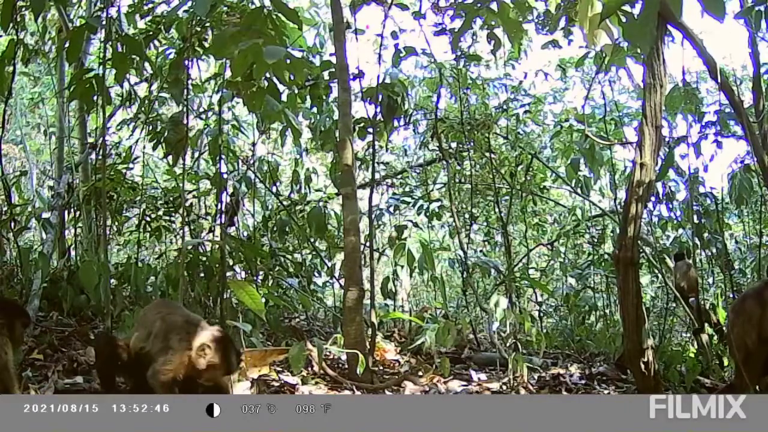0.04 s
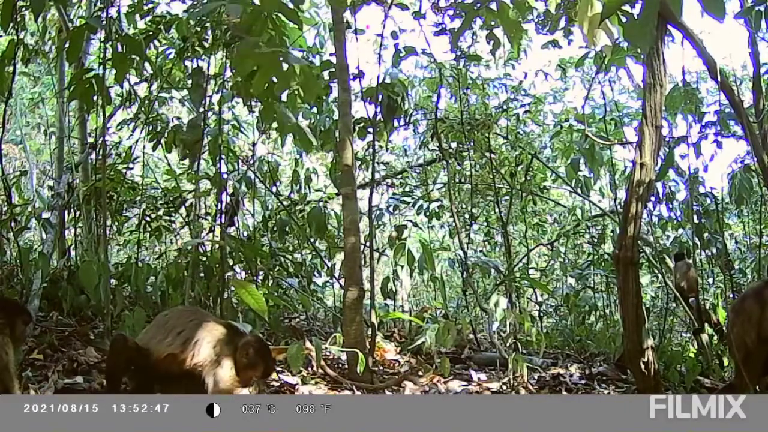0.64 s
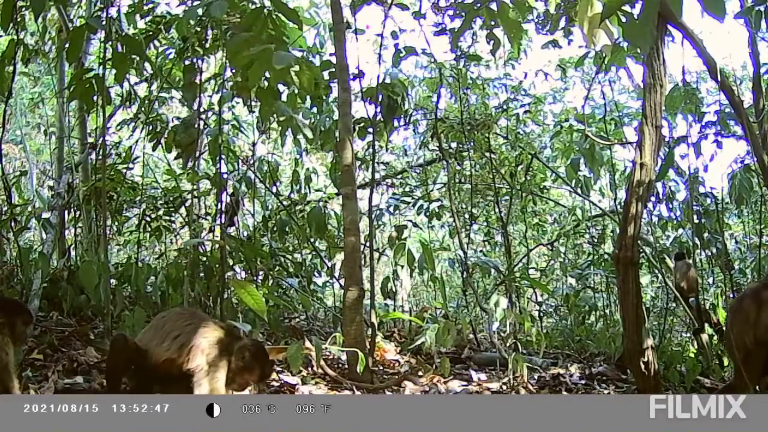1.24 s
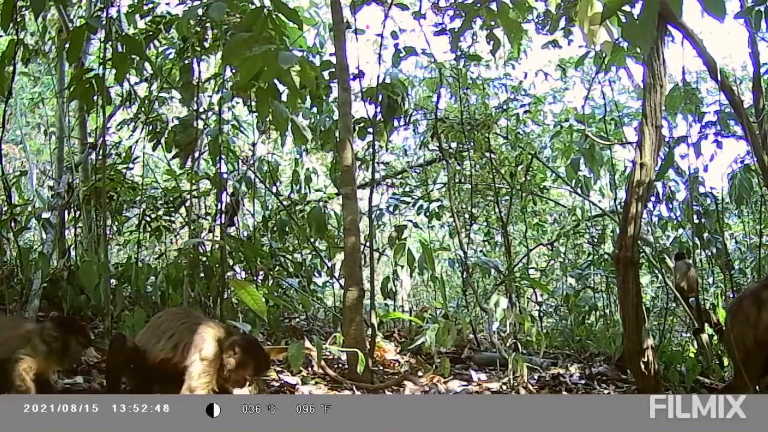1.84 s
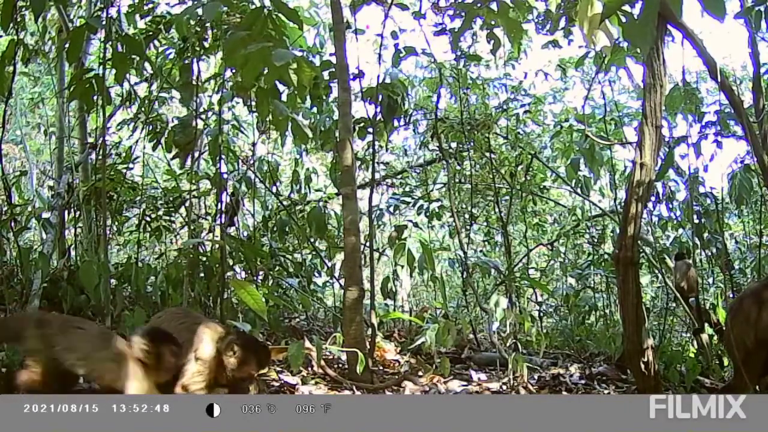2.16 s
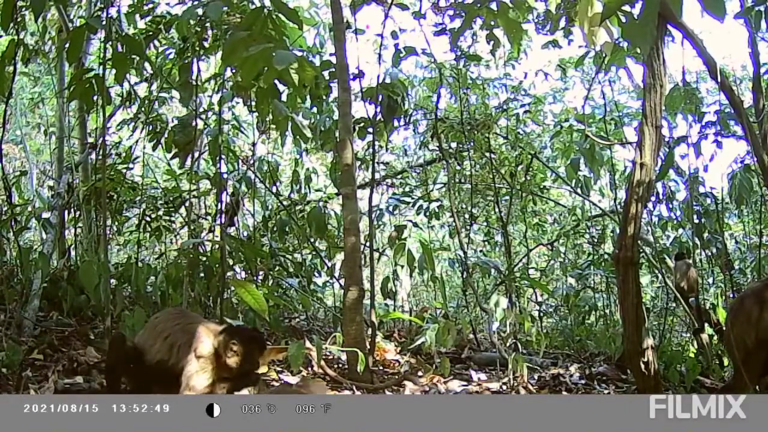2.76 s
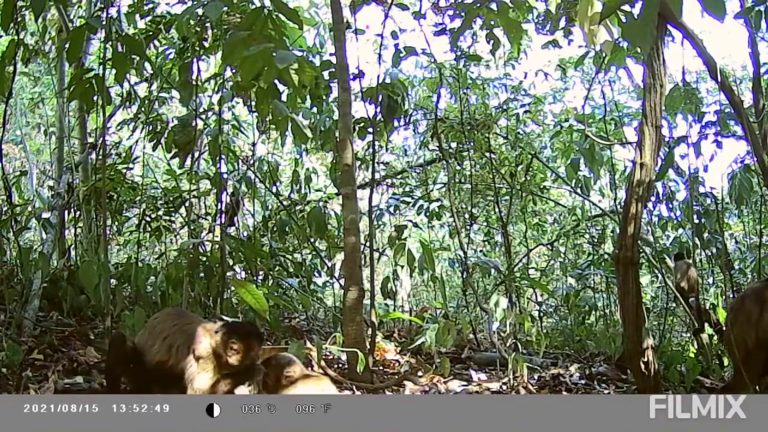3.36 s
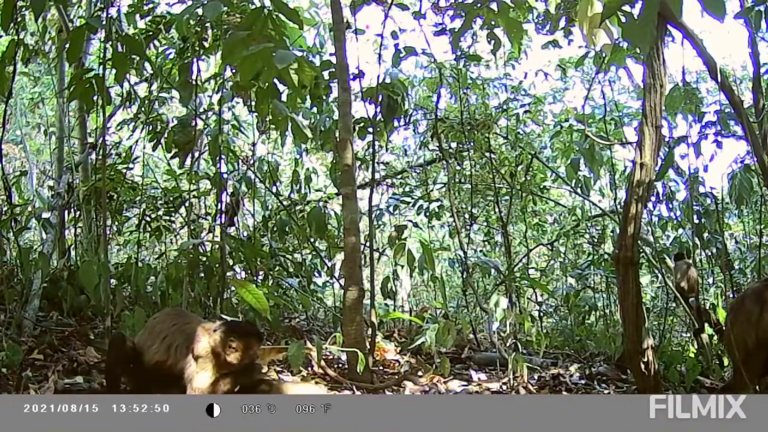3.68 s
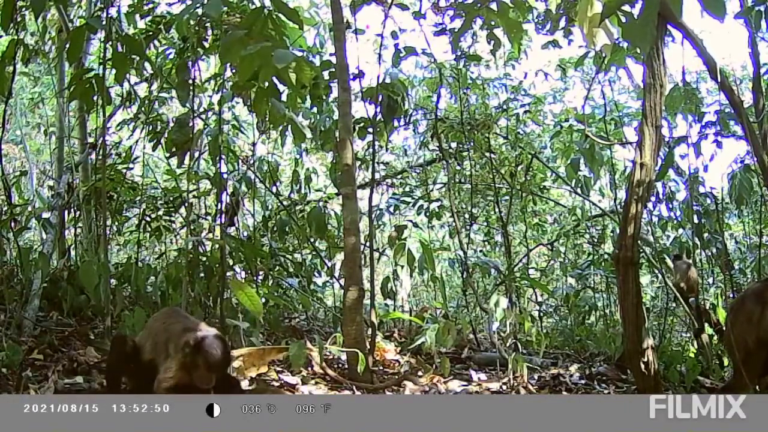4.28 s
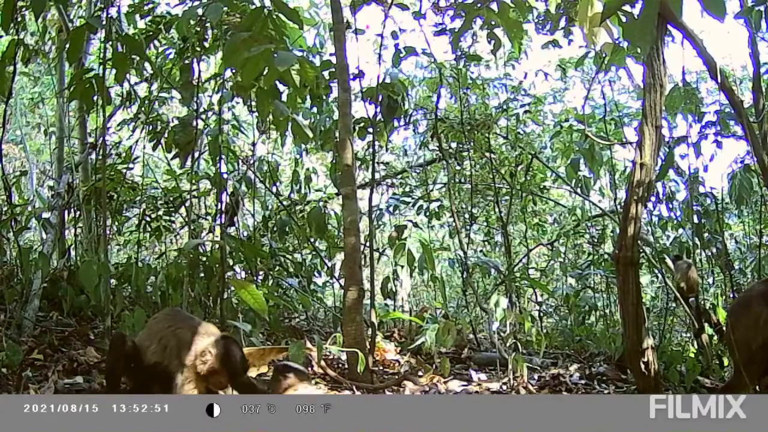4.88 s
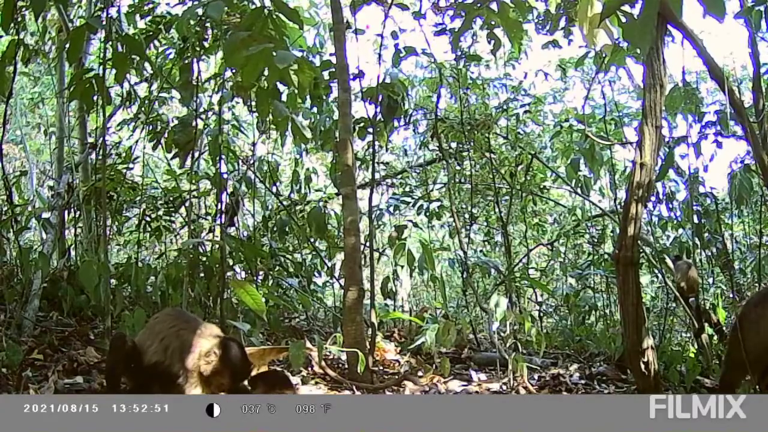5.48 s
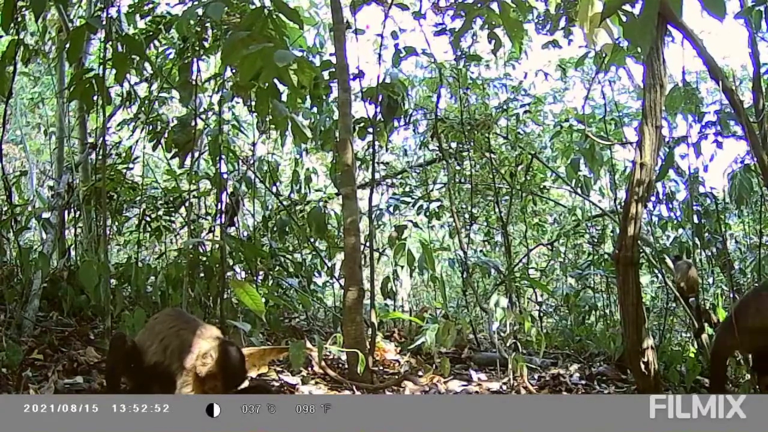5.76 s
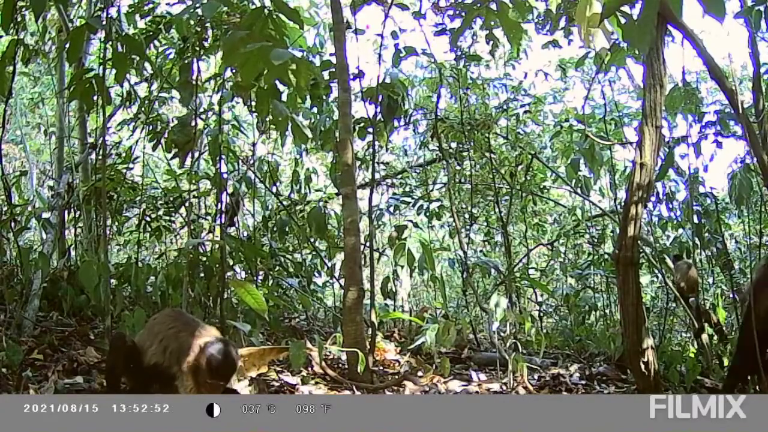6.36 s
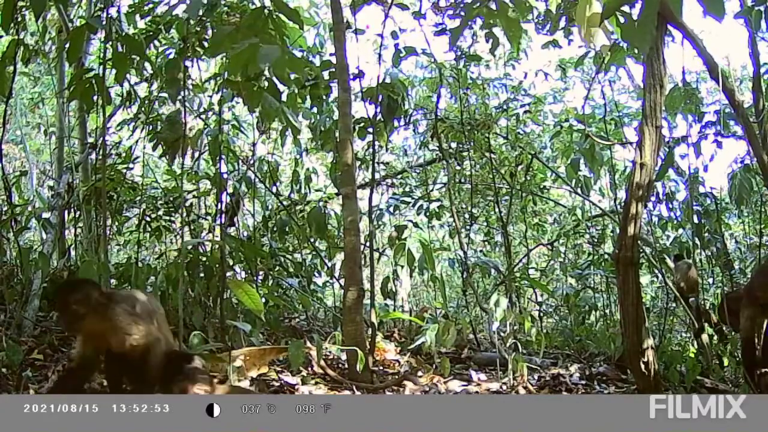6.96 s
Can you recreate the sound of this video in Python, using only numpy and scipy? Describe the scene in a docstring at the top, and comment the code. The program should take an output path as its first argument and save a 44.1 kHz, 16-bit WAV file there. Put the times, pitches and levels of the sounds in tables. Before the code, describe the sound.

Monkeys rummage in dry leaves close to the microphone, under a constant high cicada chorus and a faint low forest murmur. Short, pure chirps open, and a nearby cicada starts buzzing. One falling, raspy squeak leads into crackling leaves and small twig snaps. Distant mews and soft whistles come and go. The near cicada pauses during the loudest burst of chirps, then resumes among the final calls.

```python
"""Capuchin monkeys forage on a forest floor, heard by a faintly humming trail camera under steady cicadas.
First come steps in dry leaves, a few close, pure chirps and a far mew; the nearest cicada starts to buzz.
At 2 s a close squeak plunges and breaks into a rasp, then leaves crunch and twigs tick under their hands.
From 4.5 s soft whistles come from deeper in the trees, and at 5 s the loudest chirps, near the microphone.
The nearest cicada rests through these and resumes at 6.3 s, among the last calls and rustles."""
import sys
import numpy as np
from scipy import signal
from scipy.fft import rfft, irfft
from scipy.io import wavfile
from scipy.ndimage import uniform_filter1d, map_coordinates

SR = 44100
rng = np.random.default_rng(int(sys.argv[2]) if len(sys.argv) > 2 else 0)


def log_audio(samples):
    """Write samples as a 16-bit WAV file to the path given in sys.argv[1]."""
    # one column per channel
    frames = np.atleast_2d(samples).T
    # limit to full scale, then quantise
    limited = np.clip(frames, -1, 1)
    pcm = np.round(limited * 32767).astype(np.int16)
    wavfile.write(sys.argv[1], SR, pcm)


N = 314433
T = np.arange(N) / SR


def from_db(db):
    """Decibels to gain."""
    return 10 ** (np.asarray(db) / 20)


def rms_one(x):
    """Scale to rms 1."""
    return x / np.sqrt(np.mean(x ** 2) + 1e-20)


def in_time(rows, t=T):
    """Each column of a timed table, joined by straight lines."""
    times, *columns = np.transpose(sorted(map(tuple, rows)))
    return [np.interp(t, times, column) for column in columns]


def span(length):
    """Progress from 0 to 1 through a sound of this length in seconds."""
    return np.linspace(0, 1, max(int(length * SR), 2))


def drift(per_s, size=N):
    """A smooth random wander with a spread of about 1."""
    knots = rng.standard_normal(int(size / SR * per_s) + 4)
    return map_coordinates(knots, [np.arange(size) * per_s / SR], order=2, mode="nearest")


def colour(x, spectrum):
    """Filter by a spectrum that falls 20 dB an octave past its ends."""
    hz, db = np.transpose(sorted(map(tuple, spectrum)))
    octave = np.log2(np.maximum(np.arange(N // 2 + 1) * SR / N, 1))
    outside = np.abs(octave - np.clip(octave, np.log2(hz[0]), np.log2(hz[-1])))
    return irfft(rfft(x) * from_db(np.interp(octave, np.log2(hz), db) - 20 * outside), N)


def band(x, low_hz, high_hz):
    """Causal band-pass."""
    return signal.sosfilt(signal.butter(2, [low_hz, high_hz], "band", fs=SR, output="sos"), x + 1e-18)


def resonate(x, modes):
    """Parallel resonances with alternating signs."""
    out = 0
    for k, (hz, width, db) in enumerate(modes):
        r = np.exp(-np.pi * width / SR)
        ring = signal.lfilter([1, 0, -1], [1, -2 * r * np.cos(2 * np.pi * hz / SR), r * r], x + 1e-18)
        out = out + (-1) ** k * from_db(db) * (1 - r * r) / 2 * ring
    return out


def pulses(per_s):
    """One click a cycle, shared between its two neighbouring samples."""
    cycles = np.cumsum(per_s) / SR
    fired = np.diff(np.floor(cycles), prepend=0)
    late = fired * (cycles % 1) * SR / per_s
    return fired - late + np.roll(late, -1)


def add(out, start_s, sound):
    """Mix a sound in at a time."""
    at = max(int(start_s * SR), 0)
    out[at:at + len(sound)] += sound[:max(N - at, 0)]


def trees(x, t60, wet_db):
    """On the way to the microphone a few trunks answer distinctly and foliage scatters a tail."""
    # echoes off trunks and ground: (delay [s], level [dB])
    echoes = [(.013, -27), (.024, -30.5), (.037, -39.5), (.061, -37.5)]
    t = T[:SR]
    response = rng.standard_normal(SR) * from_db(-60 * t / t60) * (1 - np.exp(-t / 0.0046))
    response *= from_db(wet_db) / np.sqrt(np.sum(response ** 2))
    for delay, db in echoes:
        response[int(delay * SR)] += from_db(db)
    return x + signal.fftconvolve(x, response)[:N]


def background(murmur_db=-56, throb_hz=24.3, throb_db=-58):
    """Far forest murmur and a low throb, with the hum of the camera's own electronics."""
    # the distant forest: (frequency [Hz], relative level [dB])
    murmur_spectrum = [(18, -29.5), (30, -4.5), (76, -23), (343, -34.5), (628, -38), (700, -38), (779, -39),
                       (1010, -41), (3380, -40.5), (3930, -42), (5200, -38), (6760, -78), (11400, -120)]
    # camera hum: (frequency [Hz], rms level [dB])
    hum_tones = [(48.5, -75.5), (97, -79.5), (121, -77.5), (145, -78), (681, -80.5), (705, -75), (729, -83)]
    hum = sum(from_db(db) * np.sqrt(2) * np.sin(2 * np.pi * (hz * T + rng.random()))
              for hz, db in hum_tones)
    throb = np.sqrt(2) * from_db(throb_db + 2 * drift(9.4))
    throb *= np.sin(2 * np.pi * throb_hz * T + .3 * drift(8.3))
    murmur = from_db(murmur_db) * rms_one(colour(rng.standard_normal(N), murmur_spectrum))
    return hum * from_db(drift(4.5)) + throb + murmur


def cicada_chorus(level_db, swell_db, whine_db):
    """Many far insects blur into a shrill band with two steady whines in it."""
    # the massed song: (frequency [Hz], relative level [dB])
    song_spectrum = [(4800, -48), (5600, -25), (6000, -16), (6200, -11), (6700, -5), (6800, 1.5), (6920, 0),
                     (7150, 0.5), (7400, -9.5), (7600, -14), (8000, -19.5), (8350, -24), (8650, -37.5),
                     (9000, -20)]
    # its whines: (frequency [Hz], width [Hz], gain [dB])
    whine_modes = [(6900, 11, 2), (7020, 18, -2)]
    low = band(colour(rng.standard_normal(N), song_spectrum), 4500, 7430)
    high = band(colour(rng.standard_normal(N), song_spectrum), 7240, 9450)
    # the insects' pulses come and go on their own in each half of the band
    chorus = rms_one(low * from_db(drift(320)) + high * from_db(1.6 * drift(260)))
    chorus *= from_db(swell_db * drift(11) + 0.49 * drift(40))
    whines = resonate(rng.standard_normal(N), whine_modes)
    whines = resonate(whines, [(hz, 8 * width, 0) for hz, width, _ in whine_modes])  # steeper skirts
    return from_db(level_db) * (chorus + from_db(whine_db) * rms_one(whines))


def nearest_cicada(clicks_per_s, fade_s, whine_db):
    """Tymbal clicks run together into a ringing buzz, smeared by the canopy, beside a thin whine."""
    # bouts of song: (start [s], end [s], buzz level [dB])
    bouts = [(.55, 4.82, -46), (6.33, 7.3, -45.5)]
    # the buzz rings at 6900 and 7400 Hz; 8550 Hz is the camera converter's faint mirror of it:
    # (frequency [Hz], width [Hz], gain [dB])
    buzz_peaks = [(6900, 300, 0), (7400, 250, -3), (8550, 200, -27)]
    # the wandering whine: (time [s], pitch [Hz])
    whine_pitch = [(1.25, 7485), (1.5, 7370), (2.2, 7360), (2.4, 7470), (2.75, 7470), (3.0, 7360),
                   (3.4, 7380), (3.7, 7460), (6.35, 7500), (6.65, 7415)]
    singing = sum(from_db(db) * np.clip(np.minimum(T - start, end - T) / fade_s, 0, 1)
                  for start, end, db in bouts)
    clicks = pulses(clicks_per_s * (1 + .002 * drift(5) + .003 * drift(200)))
    buzz = trees(band(resonate(clicks, buzz_peaks), 6500, 8100), t60=.12, wet_db=3)
    whine_hz, = in_time(whine_pitch)
    whine = from_db(whine_db + 2 * drift(30))
    whine *= np.sin(2 * np.pi * np.cumsum(whine_hz + 10 * drift(150)) / SR)
    return singing * (rms_one(buzz) + whine)


def leaf_litter(stir_db, cracks_per_s, spread_db, friction, settle_s):
    """Dry leaves near the microphone break in tiny cracks of uneven size, over a soft rubbing."""
    # steps and rummaging: (start [s], length [s], level [dB])
    crunches = [(0.267, 0.098, -56), (0.36, 0.071, -53.5), (0.481, .01, -51.5), (1.69, .02, -56),
                (1.912, .045, -53.5), (2.318, 0.021, -50.5), (2.449, 0.11, -60), (2.568, 0.027, -46),
                (2.677, 0.086, -50.5), (2.76, .01, -50.5), (2.986, 0.21, -58.5), (3.173, 0.053, -48),
                (3.238, 0.012, -44), (3.34, 0.084, -54.5), (4.628, 0.15, -59), (6.154, 0.034, -55.5),
                (6.355, 0.014, -52.5), (6.492, .025, -53), (6.752, .03, -59)]
    # dry leaves: (frequency [Hz], relative level [dB])
    leaf_spectrum = [(300, -10.5), (700, -11), (1200, -10), (1900, -2), (2800, -3.5), (4000, 0.5),
                     (5500, 1.5), (8000, -24.5)]
    power = from_db(stir_db + 1.87 * drift(5.7)) ** 2
    for start, length, db in crunches:
        pressed = np.clip((T - start) / 0.0024, 0, 1)
        settling = np.exp(-np.clip((T - start - length) / settle_s, 0, 20))
        power += from_db(db) ** 2 * pressed * settling
    sizes = from_db(spread_db * np.minimum(rng.exponential(1, N), 3.5)) * rng.choice([-1, 1], N)
    cracks = sizes * (rng.random(N) < cracks_per_s / SR)
    # each crack shakes its leaf for a moment
    cracks = signal.fftconvolve(cracks, np.exp(-T[:SR // 200] / 0.00071))[:N] * rng.standard_normal(N)
    rubbing = friction * rng.standard_normal(N)
    return np.sqrt(power) * rms_one(colour(rms_one(cracks) + rubbing, leaf_spectrum))


def footfalls():
    """The soil answers a foot with a short dull thud."""
    # soil resonances: (frequency [Hz], level [dB], decay [s])
    soil_modes = [(217, -7.5, 0.017), (263, -2, 0.022), (324, -14.5, 0.0043), (484, -10.5, 0.012),
                  (620, -10, 0.0085)]
    # soft steps: (time [s], gain [dB])
    steps = [(.41, -42.5), (.438, -52.5), (5.028, -46.5), (5.061, -53)]
    out, t = np.zeros(N), T[:SR // 5]
    thud = sum(from_db(db) * np.exp(-t / decay) * np.sin(2 * np.pi * hz * t)
               for hz, db, decay in soil_modes)
    for start, db in steps:
        add(out, start, from_db(db) * thud * (1 - np.exp(-t / 0.0015)))
    return out


def twigs(gain_db, decay_s, tail_db, tail_s, ring_width_hz, ring_db):
    """A sharp crack with a brief woody ring, then a short shiver of the leaves around it."""
    # twigs and dry leaf edges: (time [s], relative peak [dB], ring [Hz])
    snaps = [(0.0723, -41, 5020), (1.0834, -39, 2930), (2.3515, -35.5, 4180), (2.4108, -39.5, 2670),
             (2.7725, -36, 4860), (3.1778, -39, 5200), (3.2435, -31, 3690), (3.5678, -39, 4300),
             (3.6535, -30, 4630), (3.718, -31.5, 3800), (4.5161, -42.5, 2300), (4.6352, -50, 2540),
             (5.445, -46, 4470), (6.0838, -36, 3530), (6.366, -39, 2790), (6.4035, -39.5, 5130),
             (6.4961, -39, 3390), (6.945, -43, 3150)]
    out, t = np.zeros(N), T[:SR // 20]
    envelope = np.exp(-t / decay_s) + from_db(tail_db) * np.exp(-t / tail_s)
    for start, db, hz in snaps:
        crack = band(rng.standard_normal(len(t)) * envelope, 700, 5800)
        crack += resonate(crack, [(hz, ring_width_hz, ring_db)])
        add(out, start, from_db(db + gain_db) * crack / np.abs(crack).max())
    return out


def voice(calls, edge_s, jitter, flutter_db, click_db=-80):
    """A monkey's vocal folds make gliding tones with a few harmonics, unsteady in pitch and strength."""
    out = np.zeros(N)
    for start, hz, db, harmonics_db in calls:
        t = T[:len(hz)]
        phase = 2 * np.pi * np.cumsum(hz * (1 + jitter * drift(300, size=len(t)))) / SR
        gate = np.sin(np.pi / 2 * np.clip(np.minimum(t, t[-1] - t) / edge_s, 0, 1))
        tone = sum(from_db(harmonic_db + flutter_db * drift(70, size=len(t))) * np.sin(k * phase)
                   for k, harmonic_db in enumerate([0, *harmonics_db], 1))
        add(out, start, np.sqrt(2) * from_db(db) * gate * tone)
        # the folds click as they catch and let go
        for at_s, edge_db in (start, db[0]), (start + t[-1], db[-1]):
            click = rng.standard_normal(SR // 100) * np.exp(-T[:SR // 100] / 0.005)
            add(out, at_s, from_db(edge_db + click_db) * band(click, 1800, 6600))
    return out


def whistles(fade_db=6.5):
    """Soft glides from deeper in the trees, each sagging and swelling in the middle."""
    # falling at first, then rising: (start [s], length [s], pitch [Hz], glide [Hz], sag [Hz], level [dB])
    glides = [ (4.503, .1, 1512, -160, 18, -62), (4.816, 0.13, 1538, -170, 10, -52.5),
              (5.149, .15, 1511, -130, 7.2, -57), (5.596, 0.064, 1436, 149, 50, -64),
              (5.831, 0.1, 1650, 180, 80, -57), (6.146, .105, 1677, 113, 95, -57.5),
              (6.534, 0.15, 1644, 195, 87, -61), (6.879, 0.17, 1625, 221, 59, -61.5)]
    calls = []
    for start, length, hz, glide_hz, sag_hz, db in glides:
        progress = span(length)
        off_centre = (2 * progress - 1) ** 2
        pitch = hz + glide_hz * progress - sag_hz * (1 - off_centre)
        calls.append((start, pitch, db - fade_db * off_centre, [-25]))
    return voice(calls, edge_s=0.0076, jitter=0.0076, flutter_db=2)


def mews(fade_db=8):
    """Reedy calls farther off that arch over a crest and swell in the middle, coloured by the mouth."""
    # mews at the vocal folds: (start [s], length [s], crest [share of length], first pitch [Hz],
    # crest pitch [Hz], last pitch [Hz], level [dB], 2nd harmonic [dB], 3rd harmonic [dB])
    arches = [ (0.505, 0.15, .39, 1047, 1302, 983, -58.5, 6.5, -0.5),
              (2.815, .145, .38, 985, 1206, 835, -54.5, -1, -2.5),
              (4.211, .11, 0.43, 1133, 1150, 860, -44.5, -17, -13),
              (4.831, 0.14, .27, 1104, 1277, 972, -58, 6.5, 2.5),
              (5.89, 0.062, 0.61, 1215, 1277, 1160, -61, -16, -21),
              (6.415, .128, .1, 1263, 1222, 1069, -51.5, -1.5, -5),
              (7.066, .09, 0.79, 1010, 1085, 1044, -51, -10.5, -2)]
    # the mouth's response: (frequency [Hz], gain [dB])
    mouth = [(850, -18), (1050, -11), (1200, 1), (2100, 0), (2450, -7.5), (3250, 1), (3600, -4), (5200, -2)]
    calls = []
    for start, length, crest, first_hz, crest_hz, last_hz, db, second_db, third_db in arches:
        progress = span(length)
        off_crest = np.interp(progress, [0, crest, 1], [1, 0, 1]) ** 1.3  # power 1 is pointed, 2 round
        pitch = crest_hz + (np.where(progress < crest, first_hz, last_hz) - crest_hz) * off_crest
        level_db = db - fade_db * (2 * progress - 1) ** 2
        calls.append((start, pitch, level_db, [second_db, third_db, third_db - 10]))
    return colour(voice(calls, edge_s=0.0087, jitter=0.008, flutter_db=2), mouth)


def squeak():
    """Close by, a high note plunges two octaves."""
    # the plunge: (time [s], pitch [Hz], level [dB])
    plunge = [(2.007, 3490, -67), (2.022, 3410, -51), (2.033, 3310, -51), (2.041, 2780, -48.5),
              (2.051, 1430, -43), (2.059, 1080, -57), (2.066, 750, -75)]
    start, end = plunge[0][0], plunge[-1][0]
    hz, db = in_time(plunge, np.arange(start, end, 1 / SR))
    pitch = uniform_filter1d(hz, size=300)
    return voice([(start, pitch, db, [-18, -15])], edge_s=.003, jitter=.018, flutter_db=2)


def rasp():
    """Slack vocal folds slap irregularly, each slap letting a puff of turbulence into the throat."""
    # the squeak's broken end: (time [s], slap rate [1/s], level [dB])
    contour = [(2.046, 700, -68), (2.063, 380, -44.5), (2.085, 300, -47.5), (2.104, 216, -45.5),
               (2.118, 190, -53), (2.135, 170, -57)]
    # throat resonances: (frequency [Hz], width [Hz], gain [dB])
    throat_modes = [(323, 150, 3), (587, 140, 3), (1450, 150, 4), (2020, 400, -4), (2930, 850, -7),
                    (4130, 590, -8.5)]
    per_s, db = in_time(contour)
    slaps = pulses(per_s * from_db(3.2 * drift(400)))
    puffs = uniform_filter1d(slaps, size=90) * rng.standard_normal(N)
    sound = resonate(.5 * rms_one(slaps) + rms_one(puffs) + .5 * rng.standard_normal(N), throat_modes)
    sound /= np.sqrt(uniform_filter1d(sound ** 2, size=1000) + 1e-12)  # the contour alone sets the level
    return sound * from_db(db) * (T > contour[0][0]) * (T < contour[-1][0])


def chirps(scoop_share=.13, drop_share=.11, fade_db=6, sag_hz=120, sag_at_s=.058, sag_share=.17):
    """Close, nearly pure tones that scoop onto a glide and drop as the voice lets go, weaker at the ends."""
    # chirps: (start [s], length [s], pitch [Hz], glide [Hz], scoop from below [Hz], final drop [Hz],
    # level [dB], 2nd harmonic [dB])
    notes = [ (0.52, 0.061, 3450, 215, -3, 97, -40, -29), (0.634, 0.012, 4010, 3, 0, 100, -44, -24),
             (0.695, 0.031, 4275, 2, 1, 278, -34, -39), (2.805, 0.071, 4220, -100, -5, 0, -55, -38),
             (4.162, 0.052, 3105, -190, 2, 96, -46, -42), (5.012, 0.11, 4720, -78.5, 428, 397, -30.5, -42),
             (5.13, 0.027, 4650, 76, 328, 298, -26, -45), (5.203, 0.031, 4893, -93.5, 52, 200, -27.5, -33),
             (5.284, 0.036, 4855, -170, -4, 172, -30, -30), (5.372, .033, 4735, -320, 5.5, 220, -27, -40),
             (5.952, 0.23, 3430, 201.5, -82, 682, -38.5, -23),
             (6.968, 0.08, 3190, -300, 101, 273, -39, -6.5)]
    calls = []
    for start, length, hz, glide_hz, scoop_hz, drop_hz, db, second_db in notes:
        progress = span(length)
        catching = np.exp(-progress / scoop_share)
        letting_go = np.exp((progress - 1) / drop_share)
        sagging = np.exp(-((progress - sag_at_s / length) / sag_share) ** 2)  # a held chirp sags once
        pitch = hz + glide_hz * progress - scoop_hz * catching - sag_hz * sagging - drop_hz * letting_go
        calls.append((start, pitch, db - fade_db * (catching ** 2 + letting_go), [second_db]))
    return voice(calls, edge_s=.002, jitter=.002, flutter_db=.5, click_db=-10)


def scene():
    """One microphone in the forest: close sounds arrive almost dry, far calls with more reverberation."""
    ground = leaf_litter(stir_db=-69, cracks_per_s=380, spread_db=4.5, friction=0.98, settle_s=0.021)
    ground += footfalls()
    ground += twigs(gain_db=1, decay_s=0.0012, tail_db=-18.5, tail_s=0.028, ring_width_hz=410, ring_db=7.5)
    near = trees(chirps() + squeak() + rasp() + ground, t60=0.4, wet_db=-20)
    far = trees(mews() + whistles(), t60=0.59, wet_db=-14.5)
    insects = cicada_chorus(level_db=-41.5, swell_db=0.47, whine_db=-6)
    insects += nearest_cicada(clicks_per_s=159, fade_s=.12, whine_db=-4.5)
    return (near + far + insects + background())[None]


def record(dry):
    """The camera's converter faintly mirrors the highest sounds, cuts the top and sits a little off zero."""
    converter_hz, mirror_db, cutoff_hz, offset = 16000, -16, 8844, .0055
    mirror = from_db(mirror_db) * 2 * np.cos(2 * np.pi * converter_hz * T) * band(dry, 7440, 8000)
    steep_lowpass = signal.ellip(12, .2, 80, cutoff_hz, fs=SR, output="sos")
    return signal.sosfilt(steep_lowpass, dry + mirror) + offset


dry = scene()
out = record(dry)
log_audio(out)
```